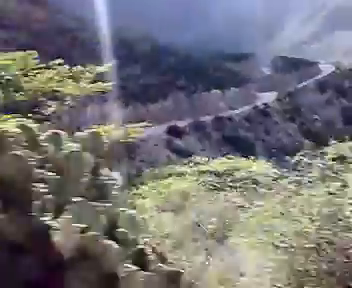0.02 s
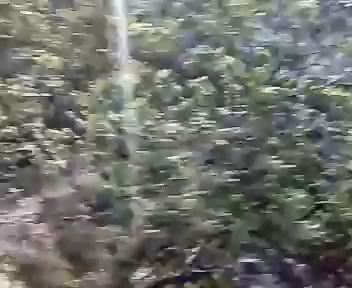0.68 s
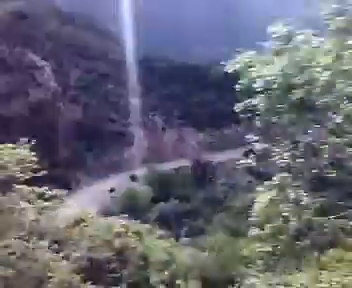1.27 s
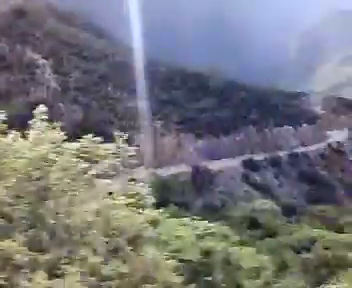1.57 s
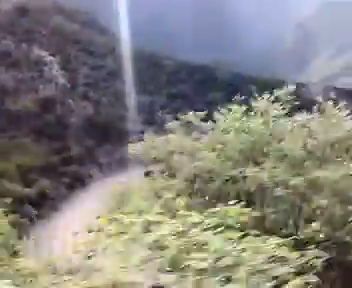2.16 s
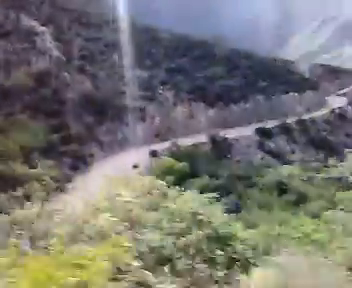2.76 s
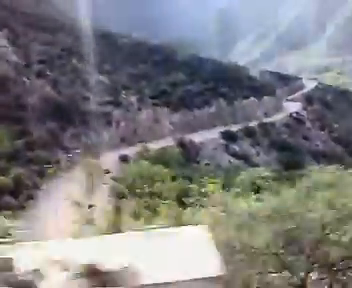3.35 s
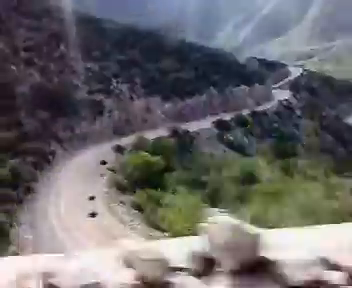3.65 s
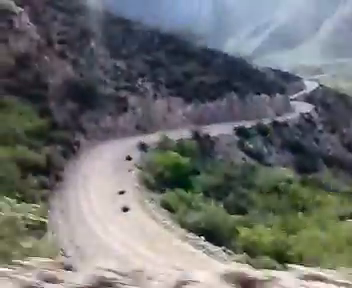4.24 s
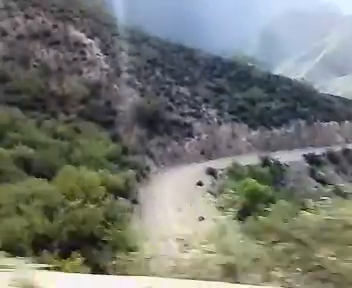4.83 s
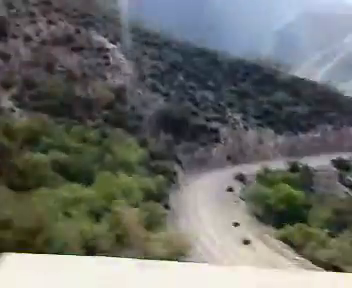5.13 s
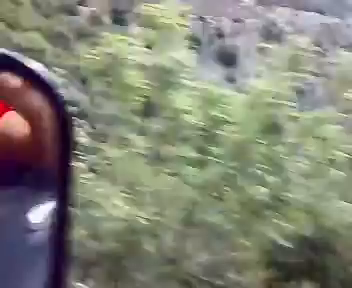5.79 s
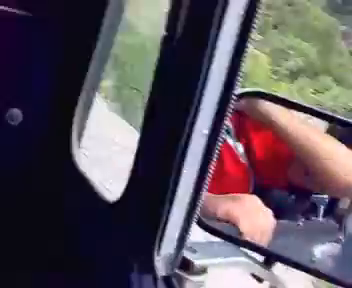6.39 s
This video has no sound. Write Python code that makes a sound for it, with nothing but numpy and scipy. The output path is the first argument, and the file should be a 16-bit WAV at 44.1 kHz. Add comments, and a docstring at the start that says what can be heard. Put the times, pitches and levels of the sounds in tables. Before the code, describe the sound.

A truck rumbles and rattles along a bumpy dirt road while ragged wind gusts knock against the microphone at an open window.

```python
"""On a dirt mountain road, a truck bumps along, heard on a phone held at its open side window.
The body rumbles on its springs, the engine drones, and the tyres crunch and throw up grit and stones.
A dry joint chirps as the cab sways, and loose fittings clatter at the bumps.
Wind hits the microphone in ragged gusts and hard, knock-like blasts;
the phone's limiter holds the loudest of them down."""
import sys
import numpy as np
from scipy import signal
from scipy.fft import rfft, irfft, next_fast_len
from scipy.io import wavfile
from scipy.ndimage import uniform_filter1d, minimum_filter1d, map_coordinates

SR = 44100
rng = np.random.default_rng(int(sys.argv[2]) if len(sys.argv) > 2 else 0)


def store_wav(level_fs):
    """Save 16-bit WAV to argv[1]."""
    pcm = np.round(np.clip(np.atleast_2d(level_fs), -1, 1) * 32767)
    wavfile.write(sys.argv[1], SR, pcm.T.astype(np.int16))


N = 287135
T = np.arange(N) / SR


def undb(db):
    """Turn decibels into a number to multiply by."""
    return 10 ** (np.asarray(db) / 20)


def curve(rows):
    """Join (time_s, value) points with straight lines."""
    return np.interp(T, *np.transpose(rows))


def unit(x):
    """Scale x so its average strength (rms) is 1."""
    return x / np.sqrt(np.mean(x ** 2) + 1e-18)


def colour(x, points):
    """Shape the lows and highs of x by (pitch_hz, level_db) points; the result has strength 1."""
    hz, db = np.transpose(points)
    size = next_fast_len(N + SR // 4)
    f = np.maximum(np.fft.rfftfreq(size, 1 / SR), 1)
    gain = undb(np.interp(np.log(f), np.log(hz), db)) * f / np.hypot(f, hz[0] / 2)
    # make the filter ring only after a hit, never before it
    cepstrum = irfft(np.log(gain), size)
    cepstrum[1:size // 2] *= 2
    cepstrum[size // 2 + 1:] = 0
    return unit(irfft(rfft(x, size) * np.exp(rfft(cepstrum)), size)[:N])


def steady(x, evenness, span_s=.04):
    """Even out the slow swells of x and keep its quick flutter."""
    power = uniform_filter1d(x ** 2, int(span_s * SR)) + 1e-6
    return unit(x / power ** (evenness / 2))


def noise():
    """A plain, even hiss."""
    return rng.standard_normal(N)


def drift(rate):
    """A smooth random wander that changes about rate times a second."""
    step = max(int(SR / rate), 1)
    return unit(uniform_filter1d(np.repeat(noise()[:N // step + 1], step), step)[:N])


def kicks(rate, spread_db):
    """Tiny pushes and pulls of random size, about rate a second."""
    gap, size, side = rng.random((N // 20, 3)).T
    at = (np.cumsum(.2 + 1.6 * gap) * SR / rate).astype(int)
    out = np.zeros(N)
    out[at[at < N]] = (np.sign(side - .5) * undb(spread_db * size))[at < N]
    return unit(out)


def burst(start_s, length_s, rise_s):
    """A quick swell that fades over about length_s."""
    age = np.maximum(T - start_s, 0)
    live = (age > 0) & (age < 4 * length_s)
    out = np.zeros(N)
    out[live] = (1 - np.exp(-age[live] / rise_s)) * np.exp(-(age[live] / length_s) ** 2)
    return out


def held_swell(start_s, hold_s, rise_s=.0013, fall_s=.0079):
    """A level that rises quickly, holds and falls away."""
    age = np.maximum(T - start_s, 0)
    return (1 - np.exp(-age / rise_s)) * np.exp(-np.clip(age - hold_s, 0, 1) / fall_s)


def ping(start_s, hz, ring_s):
    """One struck note that fades by 60 dB over ring_s."""
    out, on = np.zeros(N), slice(int(start_s * SR), int((start_s + ring_s) * SR))
    age = T[on] - T[on][0]
    out[on] = np.exp(-np.log(1000) * age / ring_s) * np.sin(2 * np.pi * hz * age)
    return out


# the body shaking between bumps: time_s, level_db
BODY_SHAKE = [(0, -26), (2.55, -24), (2.95, -33.5), (3.3, -30), (3.6, -21.5), (4.9, -29.5), (5.5, -26),
              (6.5, -23.5)]
# bumps that make the body heave: start_s, level_db
BUMPS = [(0.02, -13.5), (0.31, -14.5), (0.53, -18), (1.01, -10), (1.14, -8.5), (1.47, -9), (1.92, -8),
         (2.38, -15), (3.38, -15), (3.98, -10.5), (4.47, -18), (4.76, -13), (5.12, -15.5), (5.39, -13.5),
         (5.64, -15), (6.01, -12.5), (6.43, -19)]
# the body's deep tone: pitch_hz, level_db
RUMBLE_COLOUR = [(8, -24.5), (16, 0), (32, 4.5), (50, -1.5), (75, -5), (120, -10.5), (250, -67)]

def rumble(level_db=3.5, evenness=.7):
    """The body shakes on its springs all the way and heaves at each bump."""
    heave = colour(noise(), RUMBLE_COLOUR)
    jolts = sum(undb(db) * burst(start, length_s=.074, rise_s=.018) for start, db in BUMPS)
    strength = np.hypot(undb(curve(BODY_SHAKE)), jolts)
    return steady(heave, evenness, span_s=.1) * strength * undb(level_db)


# how fast the engine fires: time_s, rate_hz
FIRING_RATE = [(0, 68.6), (1.8, 69.3), (4, 68.62), (5.4, 68.62), (6.5, 68.77)]
# how loud it drones: time_s, level_db
ENGINE_LOUDNESS = [(0, -15), (1.16, -24.5), (1.65, -14), (2.03, -22), (2.39, -20.5), (3.0, -23),
                   (3.9, -24.5), (4.17, -19.5), (4.4, -22.5), (5.3, -15.5), (5.55, -28), (6.05, -17),
                   (6.5, -15.5)]
# the tones in the drone: times_firing_rate, level_db
ENGINE_TONES = [(.5, -22.5), (1, 4), (2, -6), (3.5, -20), (5, -30)]
# the upper tones grow as the engine pulls: time_s, boost_db
ENGINE_EDGE = [(0, -5.5), (2.5, -6), (4.4, -1.5), (5, 0), (5.6, 5), (6.5, -2)]

def engine(level_db=-3.5, waver=.022, flutter_db=2.8):
    """The engine's firing booms in the cab as a stack of slightly wavering tones."""
    firings = np.cumsum(curve(FIRING_RATE) * (1 + waver * drift(9))) / SR
    drone = 0
    for multiple, db in ENGINE_TONES:
        tone_db = db + flutter_db * drift(11) + (multiple > 1) * curve(ENGINE_EDGE)
        drone += undb(tone_db) * np.sin(2 * np.pi * (multiple * firings + rng.random()))
    return unit(drone) * undb(curve(ENGINE_LOUDNESS) + level_db)


# how loud the tyres roll on the dirt: time_s, level_db
ROLL_LOUDNESS = [(0, -32.5), (0.55, -38), (1.25, -36.5), (2.5, -33), (4.55, -35), (5.95, -30), (6.5, -34)]
# the tone of their roar: pitch_hz, level_db
ROAD_COLOUR = [(50, -14.5), (80, -7), (110, -7.5), (250, -14), (400, -16.5), (650, -18.5), (850, -23),
               (1250, -22.5), (1600, -21.5), (2100, -29), (2700, -38), (3700, -39.5), (5000, -42.5),
               (7400, -51)]
# the bright tone of small parts touching: pitch_hz, level_db
RATTLE_COLOUR = [(1500, -1.5), (2600, -0.5), (3400, 5.5), (4400, 9.5), (5500, 9.5), (6500, 7.5), (7500, -1)]

def tyres(level_db=6, grit_db=-6, flicker_db=.96, jiggle_db=-47, jiggle_growth=.94):
    """Tyres roar and crunch over grit; small parts of the cab jiggle with the road."""
    roll = undb(curve(ROLL_LOUDNESS))
    crunch = noise() + undb(grit_db) * kicks(rate=300, spread_db=7.5)
    roar = colour(crunch, ROAD_COLOUR) * undb(flicker_db * drift(35))
    jiggle = colour(kicks(rate=1500, spread_db=19) * undb(2 * drift(49)), RATTLE_COLOUR)
    return roar * roll * undb(level_db) + jiggle * unit(roll) ** jiggle_growth * undb(jiggle_db)


# the tone of grit on the wheel arch: pitch_hz, level_db
GRAVEL_COLOUR = [(200, -15.5), (450, 4.5), (700, 3.5), (900, -2.5), (1200, 3.5), (1450, -12.5), (1600, 1),
                 (1750, -12), (2300, -19), (3000, -29), (7000, -31.5)]
# bigger stones hitting the arch: start_s, level_db, pitch_hz
STONES = [(5.546, -16, 1520), (5.634, -21, 1420), (5.692, -21, 1670), (5.769, -30, 818), (5.811, -16, 1350),
          (5.883, -15, 1060), (6.001, -19, 1550), (6.117, -21, 1100), (6.145, -22, 1400),
          (6.177, -27, 1235), (6.267, -17, 1320), (6.325, -13.5, 1140), (6.375, -20, 1500),
          (6.433, -12, 786)]

def gravel(level_db=-2.5, stone_db=-5, bounce_db=-3, skip_s=.006, detune=.18):
    """Grit thrown up by the tyres taps the wheel arch; bigger stones strike it and skip twice."""
    grit = colour(kicks(rate=130, spread_db=24), GRAVEL_COLOUR)
    out = grit * undb(curve(ROLL_LOUDNESS) + level_db)
    for start, db, hz in STONES:
        for skip, (late, off_pitch) in enumerate(rng.uniform(-.993, 1, (3, 2))):
            at = start + skip * skip_s * (1 + late / 2)
            pitch_hz = hz * (1 + detune * off_pitch * skip / 2)
            out += undb(db + stone_db + skip * bounce_db) * ping(at, pitch_hz, ring_s=.034)
    return out


# lone chips of grit: start_s, level_db
GRIT_TICKS = [(0.324, -29), (0.398, -20), (3.23, -26), (4.574, -26.5), (4.631, -30)]
# the lower tone of a clank or crack: pitch_hz, level_db
CLANK_COLOUR = [(400, -4), (900, -4.5), (1500, 1.5), (2300, -5.5), (3200, -10.5), (6000, -25)]

def ticks(level_db=-8, spray_db=-53):
    """Chips of grit click on the bodywork: a few clear ones among a thin spray."""
    spray = colour(kicks(rate=28, spread_db=16), CLANK_COLOUR)
    clicks = sum(undb(db + level_db) * burst(at, length_s=.003, rise_s=.0003) for at, db in GRIT_TICKS)
    return clicks * colour(noise(), RATTLE_COLOUR) + undb(spray_db) * spray


# a dry joint chirping, higher as it rocks out and lower coming back: middle_s, level_db, pitch_hz
SQUEAKS = [(.177, -42, 5800), (.212, -55, 6240), (.479, -46, 6230), (.493, -41, 5450), (.566, -41, 5330),
           (.64, -44, 6300), (0.728, -51, 5380), (.778, -45, 5550), (.82, -44, 6150), (.915, -41, 5760),
           (.95, -44, 6200), (.98, -44, 3830), (1.087, -44, 5510), (1.289, -43, 5730), (1.384, -38, 5840),
           (1.41, -40, 6240), (1.47, -46, 3800), (1.655, -40, 3750), (1.705, -38, 5560), (1.756, -42, 6290),
           (1.801, -44, 5620), (1.872, -42.5, 5650), (1.935, -43, 6250), (2.055, -42, 5720),
           (2.352, -45, 5740), (2.519, -35, 5500), (2.612, -45, 5320), (2.955, -44, 6140),
           (3.094, -52, 6360), (3.281, -46, 5190), (3.447, -35, 5540), (3.554, -41, 5600),
           (3.653, -40, 5790), (3.734, -41, 5320), (3.852, -44, 5500), (3.992, -44, 6200),
           (4.055, -37.5, 5570), (4.155, -37.5, 6250), (4.312, -44, 5500), (4.335, -42, 6120),
           (4.371, -45, 6270), (4.431, -45, 6200), (4.436, -39, 5600), (4.476, -40.5, 5600),
           (4.526, -44, 6310), (4.56, -38, 5530), (4.62, -47, 6300), (4.66, -36, 5580), (4.724, -44, 6100),
           (4.74, -41, 5500), (4.857, -43, 5360), (4.886, -42, 3860), (4.898, -45, 5530),
           (4.981, -45, 6310), (5.152, -40, 5600), (5.827, -39, 5780), (5.915, -40, 5540)]

def squeaks(level_db=-1, length_s=.038, bracket_db=-11, bracket_hz=3780, rub_db=-58, rub_hz=5900):
    """A dry joint sticks and slips in short, sliding chirps that set its bracket ringing."""
    scratch, slide = .027, .014  # shares of the pitch
    wobble, grip = drift(900), unit(undb(3.8 * drift(260)))
    bracket = drift(500) * np.sin(2 * np.pi * bracket_hz * T)
    # the joint keeps rubbing faintly between chirps
    rubbing, wander = unit(undb(5 * drift(28))), .06 * drift(25)
    rub_pitch = rub_hz * (1 + wander + 2 * scratch * wobble)
    out = undb(rub_db) * rubbing * grip * np.sin(2 * np.pi * np.cumsum(rub_pitch) / SR)
    for middle, db, hz in SQUEAKS:
        lean, stretch, shake = rng.uniform(-1, 1, 3)
        half_s = length_s * 2 ** (stretch / 4) / 2
        on = np.abs(T - middle) < half_s
        along = (T[on] - middle) / half_s  # runs from -1 to 1
        pitch = hz * (1 + slide * lean * along + scratch * wobble[on])
        chirp = grip[on] * np.sin(2 * np.pi * np.cumsum(pitch) / SR)
        ring = undb(bracket_db + 2 * shake) * bracket[on]
        out[on] += undb(db + level_db) * np.cos(np.pi / 2 * along) * (chirp + ring)
    return out


# small metal parts touching: start_s, level_db, pitch_hz
CLINKS = [(2.2279, -24, 7050), (5.3607, -26, 7140), (5.8855, -29, 6880), (5.99, -22.5, 4320),
          (6.021, -33, 7200), (6.0421, -27, 4250), (6.176, -30, 4270), (6.231, -30, 6700),
          (6.3096, -22, 4160), (6.373, -26, 4480)]

def clinks(level_db=-4, ring_s=.038, click_db=-9):
    """Small metal parts meet with a click and buzz against each other as they ring."""
    buzz, hiss = unit(1 + drift(700)), colour(noise(), RATTLE_COLOUR)
    out = np.zeros(N)
    for start, db, hz in CLINKS:
        click = undb(click_db) / 2 * burst(start, length_s=.005, rise_s=.0005) * hiss
        out += undb(db + level_db) * (ping(start, hz, ring_s) * buzz + click)
    return out


# loose fittings clattering: start_s, level_db, extra_clank_db, length_s
RATTLES = [(0.009, -14, 1.5, .022), (0.07, -24, 5, 0.035), (1.099, -24, 2, 0.024), (1.251, -24.5, 2, 0.028),
           (1.569, -28.5, 9, .03), (1.635, -25.5, -9, 0.022), (1.988, -29, -6, .022),
           (2.137, -20.5, 1, .023), (2.223, -25, -15, 0.027), (2.366, -25, 4, 0.021),
           (2.484, -24.5, 0.5, .026), (2.519, -30, 8, 0.029), (2.635, -27, 6, 0.037),
           (3.303, -25, 2, 0.029), (3.745, -23, -6, 0.027), (3.877, -27.5, 4, .028), (4.77, -28, 1, 0.024),
           (5.017, -25, 4, 0.026), (5.27, -26, -12, 0.025), (5.421, -26, 4, 0.027), (5.636, -25, 4, 0.044),
           (5.769, -28, 4, 0.015), (5.81, -29.5, 9, 0.026), (5.881, -30, 5, .014), (5.99, -32, 9, 0.036),
           (6.054, -26, 5, 0.016), (6.121, -32, 6, 0.027), (6.267, -32, 2, .009), (6.326, -30, 6, 0.029),
           (6.366, -26, 6, .017), (6.44, -36, 8, 0.021)]

def rattles(level_db=-4.5, rough_db=-53.5, rough_clank_db=5.5, tap_db=-33, tap_count=140):
    """Loose fittings chatter in short, dry showers over a lower clank."""
    chatter = colour(kicks(rate=1700, spread_db=8), RATTLE_COLOUR)
    clank = colour(kicks(rate=600, spread_db=12), CLANK_COLOUR)
    clumps = steady(undb(2.5 * drift(160)), evenness=1)  # bouncing parts hit in clumps
    # a rough stretch of road keeps them shaking and adds single dull taps
    rough_start_s, rough_length_s = 5.75, .75
    shaking = held_swell(rough_start_s, rough_length_s) * undb(rough_db + 4 * drift(32))
    lowest_hz, octaves, spread_db, treble_db = 950, 2.6, 11, -11.5
    taps = np.zeros(N)
    for when, height, size in rng.random((tap_count, 3)):
        tap = ping(rough_start_s + when * rough_length_s, lowest_hz * 2 ** (octaves * height), .015)
        taps += undb(spread_db * size + treble_db * height) * tap
    out = shaking * (chatter + undb(rough_clank_db) * clank)
    for start, db, clank_db, length in RATTLES:
        shower = undb(db + level_db) * burst(start, length, rise_s=.006)
        out += shower * (chatter + undb(clank_db) * clank)
    return out * clumps + undb(tap_db) * taps


# hard, knock-like blasts of wind: start_s, level_db, pitch_hz, crack_db, fade_s
WIND_BLASTS = [(0.068, 0.5, 584, -12.5, 0.052), (0.273, -5, 450, -34, 0.042), (0.642, -9, 563, -28, 0.05),
               (0.9, 1.5, 498, -33, 0.038), (1.011, -6, 340, -24, 0.044), (1.031, -2, 407, -28, 0.047),
               (1.069, -8.5, 600, -17, 0.027), (1.218, -13.5, 750, -8, 0.081), (1.226, -9.5, 820, -22, .04),
               (1.359, -10, 480, -17, 0.036), (1.52, -16, 560, -17, 0.06), (1.71, -7, 614, -18, 0.052),
               (1.959, 5, 470, -18.5, 0.04), (2.036, -7.5, 580, -16, 0.067), (2.098, -6, 600, -21, 0.056),
               (2.31, -8, 520, -24, 0.05), (2.44, -6, 555, -18, 0.037), (2.998, -20, 560, -20, .05),
               (3.149, -16, 640, -30, .08), (3.176, -17, 600, -28, .08), (3.199, -18, 400, -30, .07),
               (3.438, -9.5, 540, -17, 0.052), (3.637, -3, 465, -31, 0.047), (3.823, -11, 566, -16, 0.064),
               (3.867, -3, 604, -20, 0.062), (3.954, -3, 530, -25, 0.04), (3.973, -10, 440, -30, 0.05),
               (4.077, -10, 720, -22, .05), (4.1, -8, 260, -15.5, 0.034), (4.171, 0, 570, -17, 0.1),
               (4.202, -12, 620, -20, 0.059), (5.399, -7, 658, -18, 0.055), (5.418, -5, 517, -24, 0.043),
               (5.47, -.5, 400, -19, 0.057), (5.546, -12, 480, -28, .055)]
# the tones in a blast's short ring: times_pitch, level_db, share_of_fade_time
BLAST_TONES = [(0.469, -6, 0.45), (1, 1, 0.37), (1.299, -2.5, 0.25), (2.1, -11.5, 0.37), (3.3, -22, 0.22)]

def wind_blasts(level_db=2, crack_trim_db=-2, crack_s=.0033):
    """Hard, knock-like blasts of wind on the microphone: a short crack, then a quickly dying ring."""
    out, hiss = np.zeros(N), colour(noise(), CLANK_COLOUR)
    for start, db, hz, crack_db, fade_s in WIND_BLASTS:
        on = (T > start) & (T < start + 2 * fade_s)
        age = T[on] - start
        ring = 0
        for multiple, tone_db, share in BLAST_TONES:
            fade = np.exp(-np.log(1000) * age / (fade_s * share))
            ring += undb(tone_db) * fade * np.sin(2 * np.pi * hz * multiple * age)
        ring *= 1 - np.exp(-2 * hz * age)  # the ring swells in over about one cycle
        crack = undb(crack_db + crack_trim_db) * np.exp(-age / crack_s) * hiss[on]
        out[on] += undb(db + level_db) * (ring + crack)
    return out


# single swirls of air hitting the microphone: start_s, level_db
BUFFETS = [(0.023, 4.5), (0.058, 0), (0.229, -5), (0.51, -6), (0.733, -11.5), (0.786, -6.5), (0.865, -12),
           (0.898, -2), (0.957, -15), (1.116, -6), (1.157, -4), (1.303, -6.5), (3.367, -6), (3.587, -2.5),
           (4.096, -1), (4.123, -4), (4.376, -3), (4.497, -4), (5.413, -2), (5.461, 1)]
# the wind's low roar: pitch_hz, level_db
WIND_COLOUR = [(30, -13.5), (70, 1), (120, 2.5), (180, 2), (280, -1.5), (450, -7.5), (800, -24.5),
               (1500, -43.5), (3000, -56), (7500, -63)]
# the brighter tone of its swirls: pitch_hz, level_db
SWIRL_COLOUR = [(200, -25.5), (420, 6.5), (650, 7.5), (1000, 0), (1600, -10.5), (2600, -22.5),
                (4000, -28.5), (7500, -42)]

def buffets(thump_db=-9, slap_db=-21):
    """A swirl of air hits the microphone with a dull thump and a shorter, brighter slap."""
    thump, slap = 0, 0
    for start, db in BUFFETS:
        push = burst(start, length_s=.022, rise_s=.0015)
        thump += undb(db + thump_db) * push
        slap += undb(db + slap_db) * push ** 2
    swirls = kicks(rate=800, spread_db=10)
    return thump * colour(swirls, WIND_COLOUR) + slap * colour(swirls, SWIRL_COLOUR)


# the steady draught at the window: time_s, level_db
DRAUGHT = [(0, -19.5), (0.85, -28.5), (2.35, -27), (2.8, -34.5), (3.35, -29), (3.9, -19), (4.6, -29.5),
           (5.6, -23), (6.5, -23)]
# gusts on top of it: start_s, length_s, roar_db, tearing_compared_to_roar_db
GUSTS = [(0, 0.0099, -8, -2), (0.023, 0.023, -10.5, -8), (.048, 0.037, -12, -6),
         (0.119, 0.053, -11.5, -7.5), (0.234, 0.0087, -13.5, -5.5), (0.268, 0.064, -11.5, -3),
         (0.334, 0.051, -9.5, -5), (0.395, 0.031, -12, 0), (0.425, 0.03, -15.5, -5.5),
         (0.539, 0.0089, -14.5, -10), (0.632, 0.0066, -11.5, -5.5), (0.668, 0.028, -12.5, -9.5),
         (0.744, 0.0075, -18.5, -9), (0.954, 0.016, -13, -12), (1.009, 0.0076, -10.5, -7.5),
         (1.028, 0.023, -9.5, -9), (1.064, 0.021, -12, -7), (1.208, 0.036, -12, -7.5),
         (1.354, 0.017, -12.5, -13), (1.504, 0.058, -9, -13.5), (1.554, 0.057, -11, -7),
         (1.703, 0.044, -8, -8.5), (1.95, 0.026, -9.5, -7), (2.01, 0.014, -15.5, -8),
         (2.027, 0.058, -13, -1.5), (2.098, 0.085, -14, -1.5), (2.198, 0.04, -14.5, -6.5),
         (2.262, 0.03, -14, -7.5), (2.305, 0.04, -9, -8.5), (2.357, 0.015, -11, -5),
         (2.433, 0.027, -15.5, -3.5), (2.552, 0.015, -14, -8.5), (3.433, 0.012, -10.5, -8),
         (3.469, 0.023, -16.5, -3), (3.549, 0.015, -10, -12.5), (3.577, 0.022, -13, -8),
         (3.683, 0.026, -16, -9.5), (3.718, 0.076, -13.5, -6), (3.832, 0.05, -12, -5.5),
         (3.897, 0.023, -12, -11), (3.926, 0.012, -12, -10), (3.962, 0.017, -15, -9),
         (3.993, 0.067, -11.5, -12), (4.066, 0.051, -12, -6), (4.108, 0.016, -10.5, -6),
         (4.139, 0.033, -16, -9), (4.185, 0.034, -14, -5), (4.502, 0.011, -12, -8),
         (4.894, 0.035, -14, -11.5), (5.368, 0.023, -13.5, -7.5), (5.394, .028, -10, -6.5),
         (5.427, .026, -12.5, -17), (5.462, 0.03, -7, -9), (5.506, 0.024, -15, -8), (5.538, 0.019, -17, -8),
         (5.613, 0.038, -15, -10.5), (5.99, 0.034, -15.5, -9)]

def wind(roar_db=-1.8, tear_db=-2.3, draught_tear_db=-13, draught_swing_db=1.5):
    """Churning air roars and tears at the microphone; faster swirls are louder and brighter."""
    smooth_db, ragged_db, flutter_octaves, evenness = -9, 2.4, .14, .4
    roar_level = undb(curve(DRAUGHT) + draught_swing_db * drift(16))
    tear_level = roar_level * undb(draught_tear_db)
    for start, length, db, bright_db in GUSTS:
        gust = undb(db) * held_swell(start, length)
        roar_level = np.maximum(roar_level, gust)
        tear_level = np.maximum(tear_level, gust * undb(bright_db))
    swirls = kicks(rate=520, spread_db=14)
    speed = drift(170)
    churn = (swirls + undb(smooth_db) * noise()) * undb(ragged_db * speed / 2)
    roar = steady(colour(churn, WIND_COLOUR), evenness)
    tear = colour(swirls + undb(smooth_db) * noise(), SWIRL_COLOUR)
    # play the tearing faster and slower so its pitch follows the air speed
    position = np.cumsum(2 ** (flutter_octaves * speed))
    tear = map_coordinates(tear, [position], mode="mirror") * undb(ragged_db * speed)
    return roar * roar_level * undb(roar_db) + steady(tear, evenness) * tear_level * undb(tear_db)


def scene():
    """Everything that reaches the window, added into one channel."""
    driving = engine() + rumble() + tyres() + gravel() + ticks()
    return (driving + wind() + buffets() + wind_blasts() + rattles() + clinks() + squeaks())[None]


def record(dry):
    """The phone's limiter briefly turns down the loudest peaks; the highest treble is cut."""
    ceiling, hold_s, top_hz = .7, .003, 7500
    size = int(hold_s * SR)
    allowed_gain = np.minimum(1, ceiling / (np.abs(dry) + 1e-9))
    gain = uniform_filter1d(minimum_filter1d(allowed_gain, size), size)
    treble_cut = signal.ellip(10, .2, 80, top_hz, fs=SR, output="sos")
    return signal.sosfilt(treble_cut, dry * gain)


dry = scene()
out = record(dry)
store_wav(out)
```